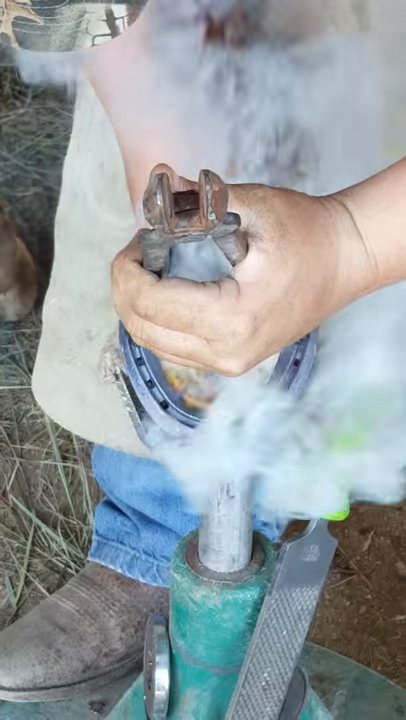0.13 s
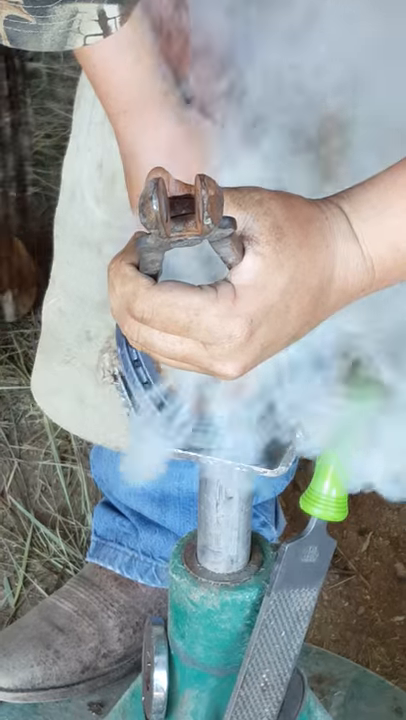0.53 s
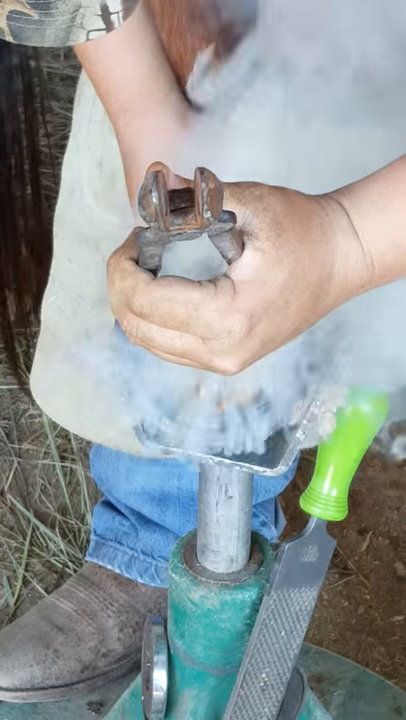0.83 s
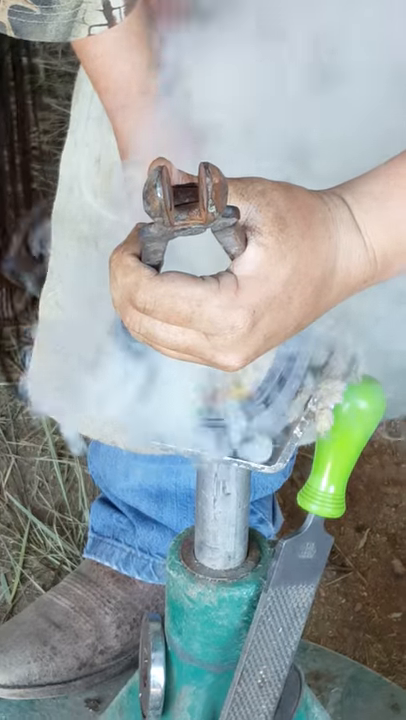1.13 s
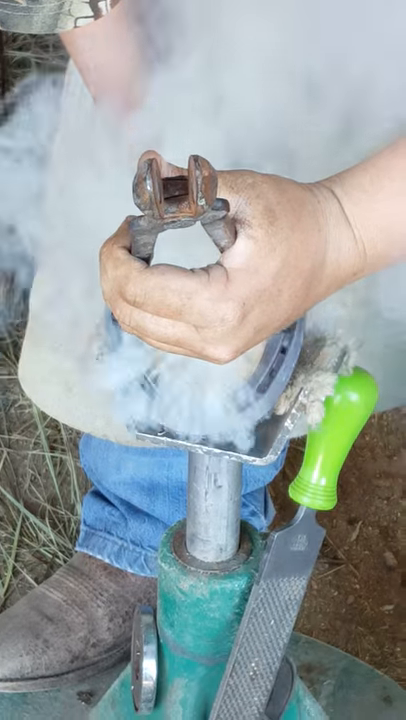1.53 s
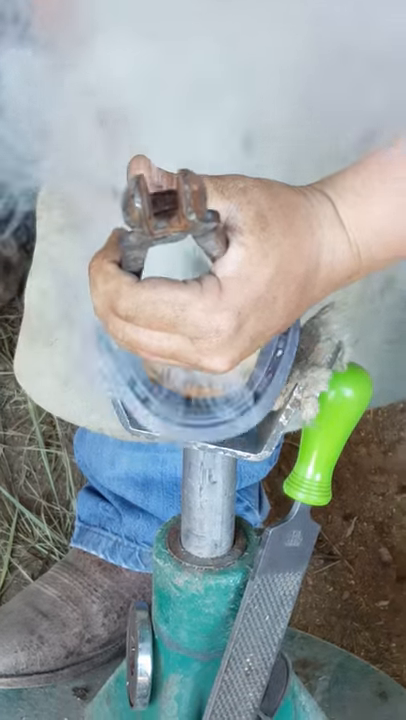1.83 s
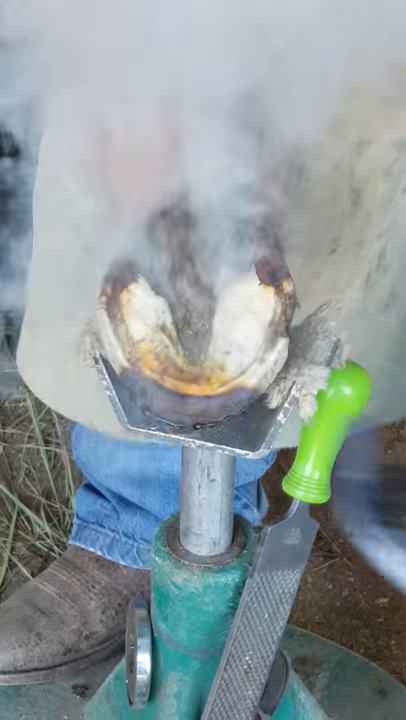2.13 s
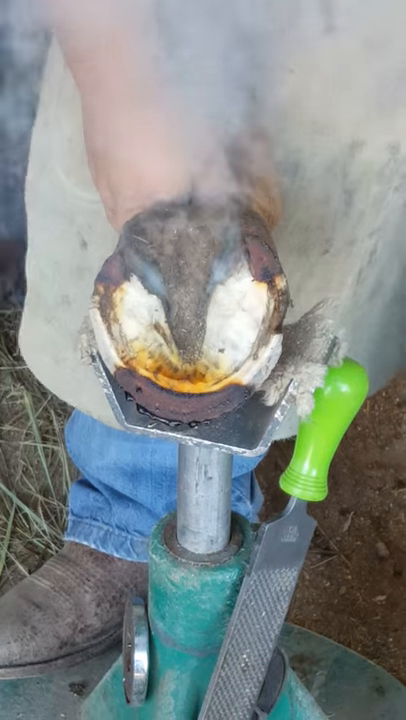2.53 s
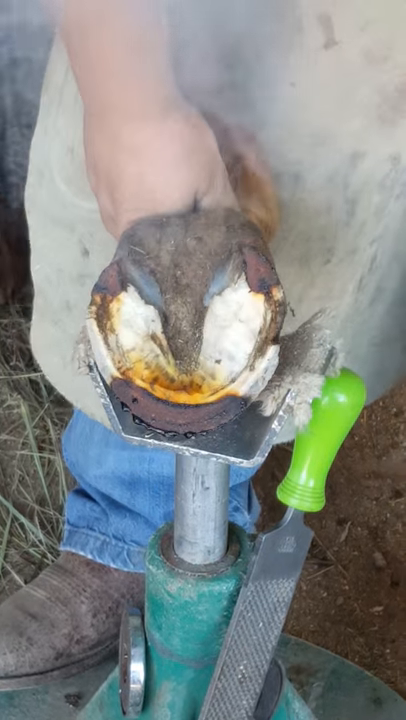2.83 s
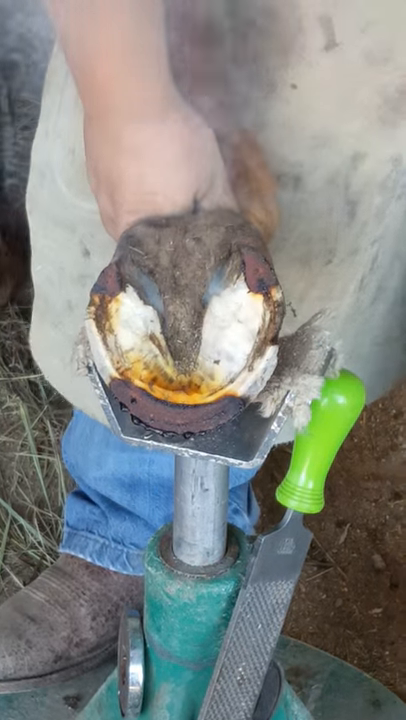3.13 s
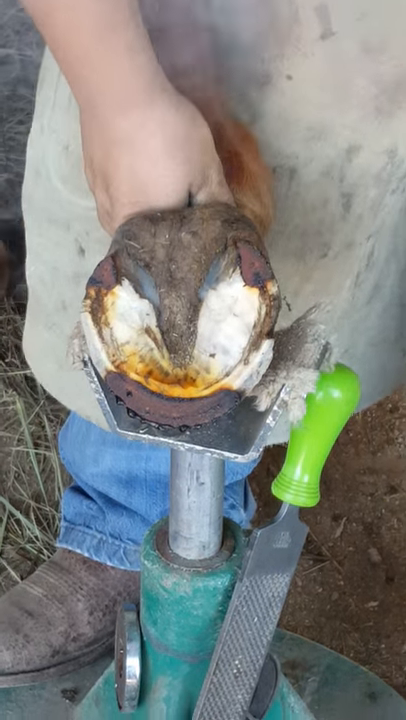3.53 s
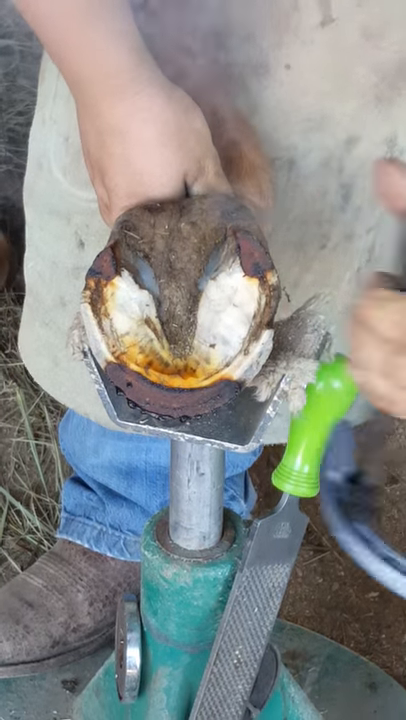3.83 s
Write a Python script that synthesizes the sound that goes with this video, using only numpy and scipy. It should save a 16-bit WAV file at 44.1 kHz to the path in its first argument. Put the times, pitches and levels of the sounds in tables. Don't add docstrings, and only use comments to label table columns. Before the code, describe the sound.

Hot horseshoe sizzles and crackles on a hoof, then stops, leaving a low forge roar.

```python
import sys
import numpy as np
from scipy import signal
from scipy.fft import rfft, irfft
from scipy.io import wavfile
from scipy.ndimage import uniform_filter1d

SR = 44100
rng = np.random.default_rng(int(sys.argv[2]) if len(sys.argv) > 2 else 0)


def ratio(d):
    e = np.asarray(d, float) / 20
    return 10 ** e


def materialize(psi):
    bounded = np.clip(np.atleast_2d(psi).T, -1, 1)
    quanta = np.round(bounded * 32767).astype(np.int16)
    wavfile.write(sys.argv[1], SR, quanta)


N = 176400
HZ = np.maximum(np.arange(N // 2 + 1) * SR / N, 1)


def level(x, db):
    return x * ratio(db) / np.sqrt(np.mean(x ** 2))


def by_hz(table):
    f, value = np.array(table).T
    return np.interp(np.log(HZ), np.log(f), value)


def by_time(table, column=1):
    columns = np.array(table).T
    return np.interp(np.arange(N) / SR, columns[0], columns[column])


def boosts(table):
    return sum(boost / (1 + (2 * (HZ - f) / width) ** 2) for f, width, boost in table)


def shape(x, gain):
    return irfft(rfft(x) * gain, N)


def walk(rate):
    hold = int(SR / rate)
    steps = np.repeat(rng.standard_normal(N // hold + 1), hold)
    return 1.44 * uniform_filter1d(uniform_filter1d(steps, hold), hold)[:N]


def flicker(x, own_db, rate, tilt_db):
    out = 0
    for k in range(14, 30):
        band = shape(x, np.clip(1 - abs(2 * np.log2(HZ) - k), 0, 1))
        lean_db = tilt_db * (k / 2 - np.log2(6000))
        out = out + band * ratio(own_db * walk(rate) + lean_db)
    return out


# time in seconds, level in dB, brightness in dB per octave.
BURN = [(.4, -52, -0.5), (.74, -57, 0), (.78, -54, -1), (.96, -52.5, -0.5), (1.05, -53.5, 0),
        (1.15, -53.5, -1.5), (1.25, -53.5, -0.5), (1.55, -53, -1.5), (1.65, -53, -1), (1.8, -53, -0.5),
        (1.875, -50.5, 1.5), (1.895, -58, -1.5), (1.97, -59, -2.5), (2.0, -63.5, -2), (2.16, -66.5, 1),
        (2.19, -80, 9), (2.4, -73, 1), (2.6, -78, -1.5)]
# frequency in Hz, level in dB.
FIZZ = [(400, -34), (1000, 7.5), (2000, 6), (4000, 2.5), (8000, -0.5), (11000, -6), (16000, -4.5)]
# frequency in Hz, width in Hz, boost in dB.
NEAR_RESONANCES = [(3640, 780, -2.5), (5420, 1300, 3), (7900, 360, 2), (8600, 340, 4), (12800, 750, 4.5),
                   (13850, 700, -8), (15200, 520, 7)]


def fizz():
    bursts_per_s, scatter_db, biggest_bubble = 1900, 3.4, 4.0
    burst_db, steam_db, coherent_share = -1.5, -5.5, 0.72
    color = ratio(by_hz(FIZZ) + boosts(NEAR_RESONANCES))
    sources = []
    for _ in range(3):
        size = ratio(scatter_db * np.minimum(rng.exponential(size=N), biggest_bubble))
        bursts = (rng.random(N) < bursts_per_s / SR) * size * rng.choice([-1, 1], N)
        steam = level(rng.standard_normal(N), steam_db)
        sources.append(level(shape(level(bursts, burst_db) + steam, color), 0))
    common, scattered = sources[0], np.array(sources[1:])
    ports = np.sqrt(coherent_share) * common + np.sqrt(1 - coherent_share) * scattered
    boiling_db = by_time(BURN) + .5 * walk(40.46) + 1.04 * walk(150)
    return flicker(ports, 0.84, 44.82, by_time(BURN, column=2)) * ratio(boiling_db)


# time in seconds, level in dB, brightness in dB per octave.
CRACKS = [(0.3822, -35.0, -13), (0.3987, -40.0, -4), (0.4585, -38.0, -4), (0.4743, -39.5, -4),
          (0.4911, -37.0, -6), (0.5035, -35.0, -5), (0.5112, -37.0, -9), (0.5681, -38.5, -8),
          (0.6083, -39.0, -7), (0.6424, -41.0, -8), (0.6508, -38.5, -10), (0.68, -37.0, -5),
          (0.6974, -40.5, -10), (0.7115, -37.5, -7), (0.7788, -39.0, -4), (0.7852, -38.5, -6),
          (0.8142, -35.5, -4), (0.8412, -37.5, -14), (0.9223, -38.5, -7), (0.9488, -35.5, -1),
          (0.9557, -34.5, -7), (0.9642, -33.0, -6), (0.9833, -36.5, -9), (1.0056, -37.0, -4),
          (1.0239, -37.0, -9), (1.0512, -38.5, -7), (1.0703, -35.0, -8), (1.0956, -34.5, -6),
          (1.1224, -35.0, 2), (1.1319, -31.0, -2), (1.1468, -26.5, 1), (1.1514, -37.5, -7),
          (1.1701, -38.0, -8), (1.2423, -38.5, -9), (1.2489, -36.0, -8), (1.2676, -37.5, -7),
          (1.2855, -32.0, -5), (1.3384, -38.5, -12), (1.4342, -33.0, -5), (1.4465, -35.5, -8),
          (1.4838, -31.0, -1), (1.4874, -38.5, -5), (1.4977, -34.0, -8), (1.514, -36.5, -7),
          (1.5443, -37.0, -3), (1.5528, -35.5, -6), (1.5661, -38.0, -9), (1.6381, -32.0, -5),
          (1.7, -37.5, -5), (1.7166, -34.0, -7), (1.7209, -38.0, -10), (1.7607, -36.5, -2),
          (1.8127, -36.5, -6), (1.8387, -30.0, -3), (1.9132, -42.5, -12), (1.9325, -38.5, -12),
          (1.9556, -38.0, -12), (1.9639, -44.0, -13), (1.9835, -46.5, -13), (2.0726, -45.5, -12)]


def pops():
    tail_s, tail_db, late_s = 0.0008, -18, -.0001
    size, lead_in = 512, 64
    out, t = np.zeros((2, N)), np.arange(size) / SR
    f = np.maximum(np.arange(size // 2 + 1) * SR / size, 1)
    small_source = f ** 2 / (f ** 2 + 2500 ** 2)
    for s, db, tilt_db in CRACKS:
        noise = 0.3 * rng.standard_normal(size) + 0.57 * rng.standard_normal((2, size))
        crack = ratio(tail_db) * noise * np.exp(-t / tail_s)
        crack[:, 0] = 1
        tilt = ratio(tilt_db * np.log2(np.maximum(f, 2500) / 8000))
        crack = irfft(rfft(np.roll(crack, lead_in, axis=1)) * tilt * small_source, size)
        i = int((s + late_s) * SR) - lead_in
        out[:, i:i + size] += ratio(db + 3.5) * crack
    return out


# frequency in Hz, level in dB.
ROAR = [(12, -85), (20, -36), (43, -41), (121, -8), (255, -1.5), (528, -18.5), (807, -35), (1030, -32.5),
        (2500, -52.5), (3250, -85), (5500, -120)]
# frequency in Hz, width in Hz, boost in dB.
CHAMBER = [(114, 17.6, 4), (150.6, 17.4, 9), (215.7, 19, 4), (255.8, 24, 5), (302.8, 16.6, 8),
           (330, 29, 5.5), (398.7, 29.4, 7.5), (457, 18, 4.5), (528.4, 57, 4), (1001, 45, 6),
           (1140, 11, 10), (1279, 70, 7), (1636, 33, 10.5), (2368, 20, 13)]
# frequency in Hz, width in Hz, boost in dB.
TUBE = [(437, 7.3, 2.5), (488, 9.6, -2.5), (650, 17, 6), (739, 36, 5), (874, 18, 7), (945, 17, 3.5),
        (1415, 30, 3.5), (2986, 46, 6.5), (1886, 30, 4), (1540, 100, 2.5), (1104, 12, -2), (176.4, 30, -5),
        (276.4, 15.5, -1.5), (374, 19.5, -6), (65, 7.7, 0)]
# frequency in Hz, share from 0 to 1.
ROAR_ALIKE = [(30, .9), (55, .985), (90, .995), (130, .96), (220, .9), (330, .84), (480, .82), (700, .35),
              (1000, .2), (2500, 0.2)]
# frequency in Hz, left minus right in dB.
ROAR_PAN = [(30, 0), (60, -5), (125, -2), (250, 0.7), (500, -4.5), (1000, -2.2), (2500, 2.5)]
# frequency in Hz, left lead in radians.
ROAR_LEAD = [(100, 0), (220, .2), (330, .1), (480, 0), (700, 1.4), (950, .3), (1400, 1.2)]
# time in seconds, level in dB.
FLAME = [(0.72, -27.5), (0.87, -30), (1.01, -28), (1.53, -29), (1.54, -26), (1.66, -32.5), (1.71, -29),
         (2.13, -29.5), (2.15, -25), (2.19, -31), (2.38, -28), (2.57, -32), (2.66, -27), (2.71, -32.5),
         (2.78, -29), (3.15, -30), (3.23, -29), (3.97, -29.5)]


def roar():
    roar_db, flame_top_hz = -27.5, 600
    color = ratio(by_hz(ROAR) + boosts(CHAMBER + TUBE))
    alike, pan_db, lead = by_hz(ROAR_ALIKE), by_hz(ROAR_PAN), by_hz(ROAR_LEAD)
    surge = ratio(0.69 * walk(14))
    mid, side = (rfft(rng.standard_normal(N) * surge) * color for _ in range(2))
    ports = []
    for sign in (1, -1):
        mixed = np.sqrt(1 + alike) * mid + sign * np.sqrt(1 - alike) * side
        direction = ratio(sign * pan_db / 2) * np.exp(.5j * sign * lead)
        ports.append(irfft(mixed * direction, N))
    ports = np.array(ports)
    low = shape(ports, 1 / (1 + (HZ / flame_top_hz) ** 4))
    strength = level(ratio(by_time(FLAME)), 0)
    return level(ports + low * (strength - 1), roar_db)


# frequency in Hz, level in dB.
JET = [(800, -30), (1500, -5), (2500, -0.5), (4000, -2.5), (8000, -13), (10500, -21.5), (16000, -27)]
# time in seconds, level in dB, brightness in dB per octave.
FLOW = [
    (.4, -59.5, -2.5),
    (2.4, -62, -1.5),
    (2.7, -63.5, -2.5),
    (3.1, -63, -1),
    (3.3, -62.5, 0),
    (3.6, -62, 0),
    (4.0, -60.5, 2.5),
]


def jet():
    color = ratio(by_hz(JET) + boosts(CHAMBER + TUBE))
    hiss = level(shape(rng.standard_normal((2, N)), color), 0)
    return flicker(hiss, 1.0, 3.34, by_time(FLOW, column=2)) * ratio(by_time(FLOW))


# time in seconds, level in dB.
RUB = [
    (2.0, -95),
    (2.5, -80),
    (2.78, -73),
    (2.83, -77),
    (2.93, -74),
    (3.02, -73),
    (3.037, -61),
    (3.044, -69),
    (3.052, -95),
]


def leather_rub():
    center_hz, width_hz, pan_db = 3050, 1100, -9
    band = 1 / (1 + (2 * (HZ - center_hz) / width_hz) ** 4)
    rub = level(shape(rng.standard_normal(N), band), 0)
    grain_db = 2.5 * walk(59.2)
    return rub * ratio(by_time(RUB) + grain_db) * ratio([[pan_db / 2], [-pan_db / 2]])


# frequency in Hz, level in dB.
HAY = [(3000, -16.5), (5500, -11), (6100, 5), (6500, 3), (7100, -14), (11000, -11.5), (13000, -9.5),
       (16000, -6)]
# time in seconds, level in dB.
RUSTLE = [
    (2.0, -83),
    (2.35, -77),
    (2.6, -80),
    (2.85, -76),
    (3.2, -74.5),
    (3.5, -70),
    (3.75, -77),
    (4.0, -75.5),
]


def rustle():
    stalks = level(shape(rng.standard_normal((2, N)), ratio(by_hz(HAY))), 0)
    return stalks * ratio(by_time(RUSTLE) + 1.7 * walk(21))


# frequency in Hz, left lead in radians.
LEAD = [(500, -5.5), (2500, 1.96), (4300, 0.8), (6300, 1.5), (8700, 1.72), (12100, 1.4), (13400, 6),
        (15500, 3.5)]
# frequency in Hz, right minus left in dB.
SHADOW = [(1000, 4.5), (2500, 2.5), (4000, 0.5), (5400, 5), (7000, -3), (10000, 4), (12800, 5.5),
          (15500, 3)]
# frequency in Hz, width in Hz, boost in dB.
CAVITIES = [(8650, 540, 3.5), (9600, 600, -3), (11400, 900, -2.5), (12900, 1100, 2), (14200, 700, -2)]


def scene():
    left_path = np.exp(.5j * by_hz(LEAD)) * ratio(-by_hz(SHADOW) / 2)
    near = fizz() + shape(pops(), ratio(boosts(NEAR_RESONANCES)))
    flame = roar()
    far = shape(jet() + leather_rub() + rustle(), ratio(boosts(CAVITIES)))
    return shape(near, np.array([left_path, 1 / left_path])) + flame + far


def roll_off(x):
    return signal.sosfilt(signal.butter(12, 15900, fs=SR, output="sos"), x)


# frequency in Hz, level in dB.
LEFT_PORT = [(1500, 0.5), (5000, 1), (6800, 4.5), (8300, 11), (9000, 11.5), (10200, 5.5), (12500, 10),
             (15400, 12.5)]
# frequency in Hz, level in dB.
RIGHT_PORT = [(1500, -1), (3700, -1.5), (5300, 4.5), (7100, 7.5), (8400, 11), (9800, 3.5), (13000, 13.5),
              (15700, 8)]


def record(dry):
    top_hz, offset = 15745, -.0006
    fade_start_s, fade_s, fade_power = 0.37, 0.32, 1.27
    dip_db = -1 / (1 + ((HZ - 2340) / 18) ** 2)
    ports = ratio([by_hz(LEFT_PORT), by_hz(RIGHT_PORT) + dip_db])
    lowpass = np.clip((top_hz - HZ) / 100 + .5, 0, 1)
    heard = shape(dry, ports * lowpass) + offset
    fade = np.clip((np.arange(N) / SR - fade_start_s) / fade_s, 0, 1) ** fade_power
    return roll_off(heard * fade)


dry = scene()
out = record(dry)
materialize(out)
```